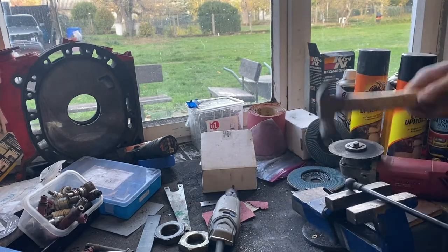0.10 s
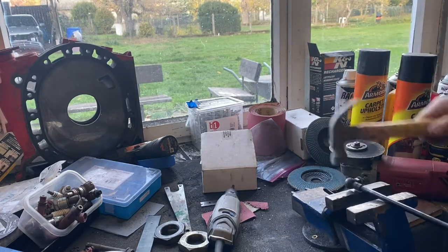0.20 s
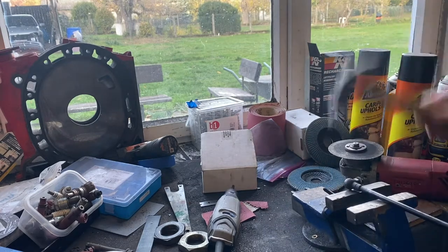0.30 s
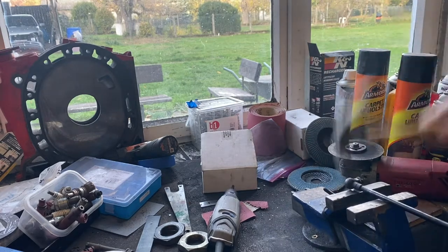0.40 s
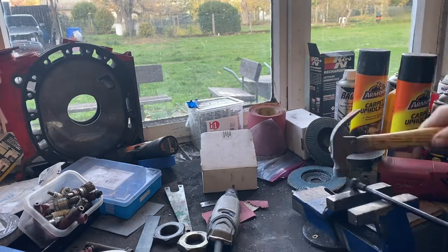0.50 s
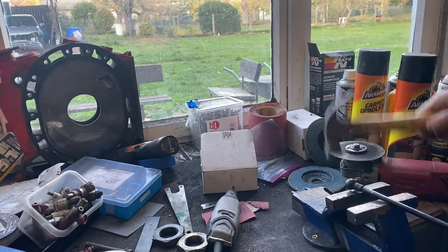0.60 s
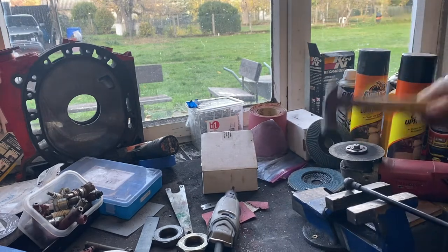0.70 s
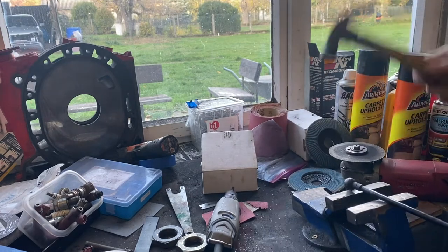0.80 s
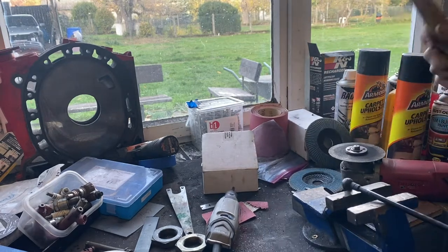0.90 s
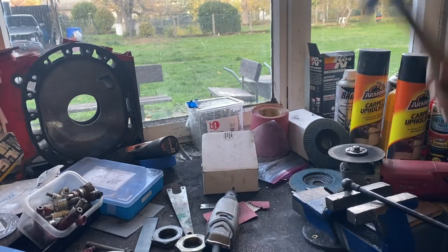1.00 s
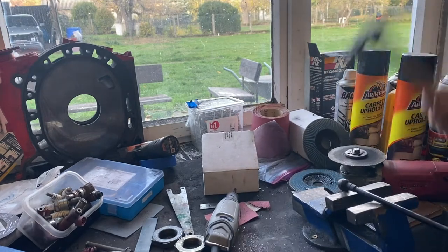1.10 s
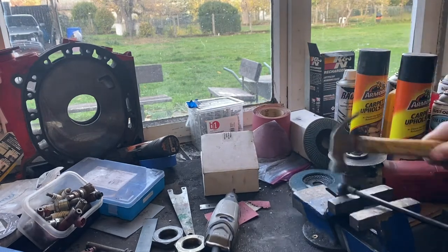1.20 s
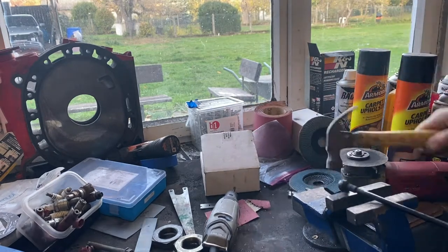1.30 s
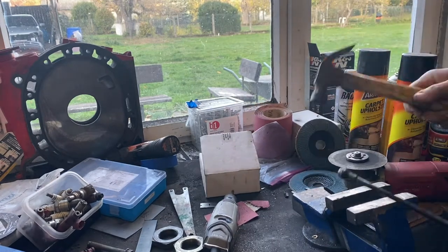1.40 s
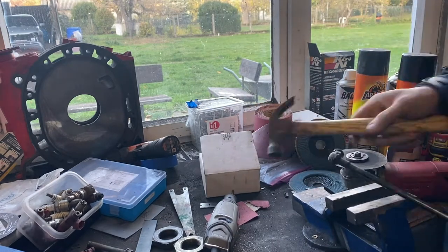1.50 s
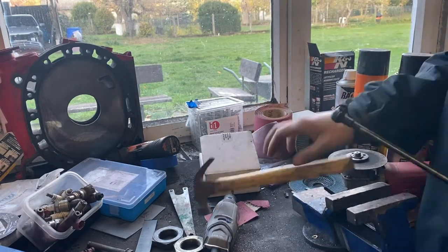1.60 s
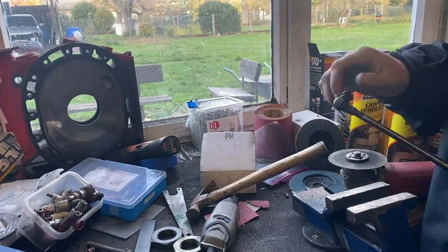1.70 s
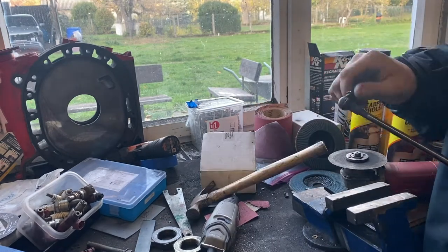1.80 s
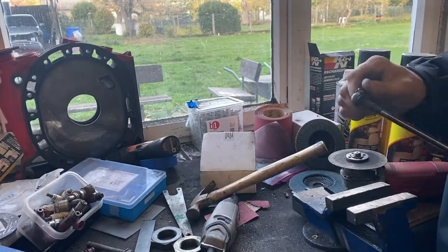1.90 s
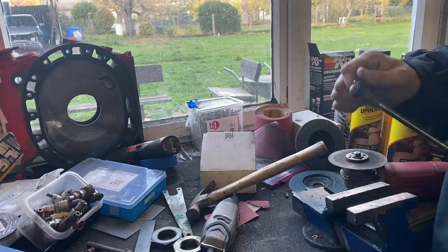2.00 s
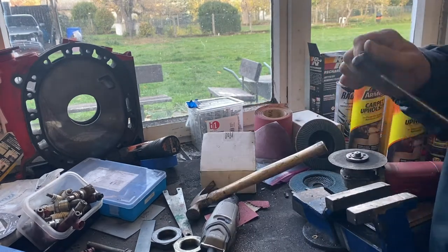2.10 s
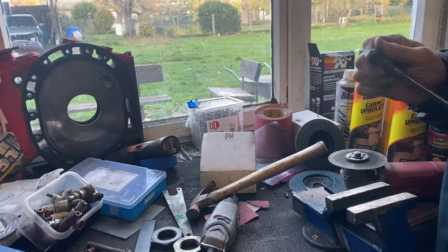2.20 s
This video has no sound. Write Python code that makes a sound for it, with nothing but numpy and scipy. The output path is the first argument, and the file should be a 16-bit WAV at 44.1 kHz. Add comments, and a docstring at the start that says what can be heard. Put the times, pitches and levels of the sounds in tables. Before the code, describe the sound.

Rapid hammering on clamped steel, bright cracks and short clanks, about eleven a second, stops abruptly; a softer wooden knocking follows as the hammer settles, then a faint sleeve brush in a quiet workshop, heard close in stereo.

```python
"""Over quiet room air, a steel hammer beats a steel part in a bench vise, about eleven blows a second.
Each blow cracks in noise bursts, rings the vise and steel as decaying partials, shakes the bench
and draws a brief noisy answer from the room. Then the hammer is laid on the bench with a short
wooden rattle of noise bursts and bench partials; last, a swell of noise is one soft sleeve brush."""
import sys
import numpy as np
from scipy.fft import rfft, irfft, next_fast_len
from scipy.io import wavfile

SR = 44100
rng = np.random.default_rng(int(sys.argv[2]) if len(sys.argv) > 2 else 0)


def store_pcm(level_fs):
    """Save levels as 16-bit WAV."""
    pcm = np.round(np.clip(level_fs, -1, 1) * 32767).astype(np.int16)
    wavfile.write(sys.argv[1], SR, np.atleast_2d(pcm).T)


N = 97020
T = np.arange(SR // 2) / SR  # time axis of one struck sound, s

# Hammer blows, layer levels before their trims: start_s, rise_s, knock_db, clank_db, crack_db,
# body_db, thud_db, rumble_db, room_db
HAMMER_BLOWS = [(0.24, 0.0051, -24.5, -31.5, -29, -23, -32.5, -44, -31.5),
                (0.357, 0.0074, -24, -37, -29, -29, -29, -40.5, -29),
                (0.4511, 0.0031, -18, -23, -24, -26, -30.5, -36.5, -28.5),
                (0.5448, 0.00033, -19, -19, -22, -40.5, -30.5, -41, -29),
                (0.6334, 0.00077, -19, -27, -24.5, -33, -31.5, -41.5, -30.5),
                (0.7197, 0.00064, -20, -15.5, -20.5, -36.5, -31.5, -41.5, -26),
                (0.811, 0.0043, -19, -26, -27, -30.5, -27.5, -40, -28),
                (0.8934, 0.00091, -19, -18.5, -21, -24.5, -33, -38.5, -28),
                (0.9819, 0.0012, -20.5, -16, -21, -24.5, -28.5, -31.5, -25.5),
                (1.068, 0.002, -19, -20, -21.5, -28, -29, -40, -28),
                (1.1609, 0.0024, -20.5, -26.5, -27.5, -22.5, -27.5, -33, -28.5),
                (1.252, 0.00048, -35.5, -19, -13.5, -32.5, -23.5, -36, -29),
                (1.338, 0.00038, -18, -14, -17.5, -34.5, -28.5, -38.5, -27.5)]
# Hammer settling on the bench: start_s, thump_db, clack_db, click_db
HAMMER_SETTLING = [(1.624, -33, -43.5, -58), (1.664, -28.5, -35.5, -39.5), (1.713, -32.5, -38.5, -55),
                   (1.726, -29, -45, -61), (1.794, -54, -68, -51.5)]

# Ringing steel partials: pitch_hz, relative_level_db, t60_s
STEEL_MODES = [(3760, -12, .2), (4532, -11, .3), (7470, -3, .35), (7540, -8, .3), (8263, -13, .2),
               (10945, 0, .35), (11010, -4, .35), (12273, -10, .25), (14400, -18, .25), (15045, -5, .3),
               (15148, -3, .3)]
# Clamped part and vise, heavily damped: pitch_hz, relative_level_db, t60_s
VISE_MODES = [(996, -8.5, 0.068), (1184, -8.5, 0.057), (1666, -1.5, 0.046), (2503, -4.5, 0.026),
              (3720, -4, 0.036)]
# Bench top partials: pitch_hz, relative_level_db, t60_s
BENCH_MODES = [(115.4, -1, 0.13), (130.4, -9.5, 0.75), (179.2, -3.5, 0.41), (271, -10, 0.37)]

# Steel contact, low part of its spectrum: pitch_hz, relative_level_db
KNOCK_COLOUR = [(150, -25.5), (330, 4), (600, -8.5), (1100, -0.5), (2000, -2.5), (2700, -9.5),
                (4000, -37.5)]
# Steel contact, middle part: pitch_hz, relative_level_db
CLANK_COLOUR = [(1600, -38), (2500, -2), (3200, -5), (3750, 0), (4300, -7), (5800, -4.5), (7500, -27)]
# Steel contact, bright part: pitch_hz, relative_level_db
CRACK_COLOUR = [(4000, -42.5), (6100, -3), (7000, 0.5), (8000, 6), (10000, 0.5), (11200, 2), (13000, -4),
                (15300, -6), (16500, -25)]
# Bench body: pitch_hz, relative_level_db
BODY_COLOUR = [(130, -23.5), (230, -3), (330, 2.5), (420, -9.5), (600, -30)]
# Bench thud: pitch_hz, relative_level_db
THUD_COLOUR = [(60, -24.5), (105, -0.5), (180, -0.5), (310, -3.5), (420, -13.5), (600, -22), (1200, -54)]
# Low shake under each blow: pitch_hz, relative_level_db
RUMBLE_COLOUR = [(15, -10), (30, -8), (60, 2.5), (90, -1), (140, -21), (300, -50.5)]
# Answer of the room: pitch_hz, relative_level_db
ROOM_COLOUR = [(200, -21.5), (450, 1.5), (1100, -1), (1900, -5.5), (2500, -3.5), (3200, -9.5), (4800, -8.5),
               (7000, -13), (11000, -21), (13000, -30), (15000, -30), (16000, -48.5)]
# Low thump of the laid-down hammer: pitch_hz, relative_level_db
THUMP_COLOUR = [(25, -13), (60, -1.5), (115, 3), (170, -1.5), (300, -10.5), (600, -18), (1200, -54)]
# Its wooden clack: pitch_hz, relative_level_db
CLACK_COLOUR = [(120, -10), (280, 0.5), (700, 4), (1500, -7), (3000, -11), (7000, -23), (15000, -34)]
# Its small bright click: pitch_hz, relative_level_db
CLICK_COLOUR = [(500, -4), (2500, 0), (7000, -2.5), (12000, -4.5), (16000, -17)]
# Steady room air: pitch_hz, relative_level_db
AIR_COLOUR = [(20, -2.5), (60, 0), (150, 1.5), (300, -9.5), (600, -9.5), (1200, -15), (3000, -19.5),
              (7500, -20), (16000, -27)]
SLEEVE_COLOUR = [(200, -11), (1000, -5), (6000, -5), (15000, -9)]  # pitch_hz, relative_level_db

# Left-right likeness of direct sound, clipped to -1..1 when used: pitch_hz, likeness
DIRECT_LIKENESS = [(100, 3.7), (450, 0.7), (1100, 0.85), (3000, -0.04), (3900, 1.85), (5300, -0.3),
                   (7000, 1.2), (15000, 0.7)]
# Left-right likeness of diffuse sound, same use: pitch_hz, likeness
ROOM_LIKENESS = [(60, 0.93), (200, .94), (450, 0.5), (1000, 0.21), (4500, 0.098), (6500, 0.17),
                 (8500, 0.96), (15000, 1)]
# Stereo lean of the contact: pitch_hz, left_minus_right_db
CONTACT_PAN = [(400, 0.5), (1000, .8), (2200, 1.5), (4000, 9), (7500, 1), (12000, 0.5)]

# Contact envelopes after each blow's own rise: hold_s, t60_s
KNOCK_ENV, CLANK_ENV, CRACK_ENV = (0.0016, 0.032), (0.0017, 0.017), (0.00054, 0.039)
# Other envelopes: attack_s, hold_s, t60_s
BODY_ENV, THUD_ENV = (0.003, 0.0089, 0.091), (0.014, 0.022, 0.34)
RUMBLE_ENV, ROOM_ENV, HANG_ENV = (0.015, 0.015, 0.22), (0.005, 0.014, 0.24), (0.01, 0.01, 0.4)
THUMP_ENV, CLACK_ENV, CLICK_ENV = (0.01, 0.011, 0.094), (0.0022, 0.003, 0.13), (0.001, 0.0013, 0.02)

# Layer trims, dB, added to the levels of each blow or settling knock
KNOCK_DB, CLANK_DB, CRACK_DB = 2, 1, 2.5
VISE_DB, STEEL_DB = -2.5, -14.5  # on top of knock_db and crack_db
BODY_DB, THUD_DB, BENCH_DB, RUMBLE_DB = 0.5, -0.5, 0, 2
ROOM_DB, HANG_DB = 2, -22
SETTLE_RING_DB = -10

# Tail drops: how early and how fast, then how deep for the steel and for bench and walls
CUT_LEAD_S, CUT_S = 0.012, 0.006
STEEL_CUT_DB, CUT_DEPTH_DB = -45, -12
LAST_LIFE_S = 0.14  # stands in for the gap after the last blow

AIR_DB = -71
BRUSH_S, BRUSH_WIDTH_S, BRUSH_DB = 2.07, 0.015, -64.5
PORT_LAG_S, LAG_ABOVE_HZ = 0.000238, 6850
TOP_HZ, TOP_ORDER = 16350, 90
CEILING = 0.9  # full scale is 1


def amp(db):
    """Decibels to gain."""
    return 10 ** (np.asarray(db) / 20)


def unit(x):
    """Scale to rms 1."""
    return x / np.sqrt(np.mean(x ** 2) + 1e-20)


def along(points, hz):
    """Read a curve of (Hz, value) points on a log frequency axis."""
    f, v = np.transpose(points)
    return np.interp(np.log(hz + 1), np.log(f + 1), v)


def add(out, start_s, sound):
    """Mix a sound in at its start time, trimmed at the end of the scene."""
    part = out[:, round(start_s * SR):][:, :sound.shape[-1]]
    part += sound[..., :part.shape[1]]


def noise(colour, alike, pan=None, size=len(T)):
    """Coloured stereo noise of rms 1; the mid-side balance sets how alike left and right are."""
    hz = np.fft.rfftfreq(size, 1 / SR)
    turn = np.arccos(np.clip(along(alike, hz), -1, 1)) / 2
    spectra = rfft(rng.standard_normal((2, size))) * amp(along(colour, hz))
    mid, side = spectra * [np.cos(turn), np.sin(turn)]
    lean = amp(np.outer([0.5, -0.5], along(pan, hz))) if pan else 1
    return unit(irfft(np.array([mid + side, mid - side]) * lean, size))


def burst(colour, shape, alike, pan=None):
    """Countless dense modes struck at once: attack, hold, decay, with a set energy."""
    attack, hold, t60 = shape
    decay_db = -60 * np.maximum(T - attack - hold, 0) / t60
    env = np.minimum(T / attack, 1) * amp(decay_db)
    return unit(env * noise(colour, alike, pan)) * np.sqrt(np.mean(env ** 2))


def ring(modes, attack, blur_hz, scatter_db):
    """Decaying partials whose phases wander, struck a little differently each time."""
    hz, db, t60 = np.transpose(modes)[:, :, None]
    steps = rng.standard_normal((len(hz), len(T)))
    drift = np.cumsum(steps, 1) * np.sqrt(2 * np.pi * blur_hz / SR)
    phase = 2 * np.pi * (hz * T + rng.random(hz.shape)) + drift
    level_db = db + scatter_db * rng.standard_normal(hz.shape) - 60 * T / t60
    return (amp(level_db) * np.sin(phase)).sum(0) * (1 - np.exp(-T / attack))


def room_air():
    """Steady, quiet coloured noise: the air of the workshop."""
    return amp(AIR_DB) * noise(AIR_COLOUR, ROOM_LIKENESS, size=N)


def sleeve_brush():
    """Cloth friction as noise under one short bell-shaped swell."""
    swell = np.exp(-0.5 * ((np.arange(N) / SR - BRUSH_S) / BRUSH_WIDTH_S) ** 2)
    return amp(BRUSH_DB) * swell * noise(SLEEVE_COLOUR, ROOM_LIKENESS, size=N)


def laying_down():
    """Head and wooden handle meet the bench one after the other and rock to rest."""
    out = np.zeros((2, N))
    for start_s, thump_db, clack_db, click_db in HAMMER_SETTLING:
        bench = ring(BENCH_MODES, attack=0.0056, blur_hz=1.7, scatter_db=1)
        thump = burst(THUMP_COLOUR, THUMP_ENV, ROOM_LIKENESS) + amp(SETTLE_RING_DB) * bench
        clack = burst(CLACK_COLOUR, CLACK_ENV, ROOM_LIKENESS)
        click = burst(CLICK_COLOUR, CLICK_ENV, DIRECT_LIKENESS)
        add(out, start_s, amp(thump_db) * thump + amp(clack_db) * clack + amp(click_db) * click)
    return out


def room_answer(room_db):
    """Dense reflections as diffuse noise: the brief answer, and a fainter, slower hang."""
    walls = amp(room_db + ROOM_DB) * burst(ROOM_COLOUR, ROOM_ENV, ROOM_LIKENESS)
    hang = amp(room_db + HANG_DB) * burst(ROOM_COLOUR, HANG_ENV, ROOM_LIKENESS)
    return walls, hang


def low_shake(rumble_db):
    """Deep rumble of the shaken bench, as a low noise burst."""
    return amp(rumble_db + RUMBLE_DB) * burst(RUMBLE_COLOUR, RUMBLE_ENV, ROOM_LIKENESS)


def shaken_bench(body_db, thud_db):
    """The cluttered bench: dense body and thud bursts, plus a few partials of its top."""
    body = amp(body_db + BODY_DB) * burst(BODY_COLOUR, BODY_ENV, ROOM_LIKENESS)
    thud = amp(thud_db + THUD_DB) * burst(THUD_COLOUR, THUD_ENV, ROOM_LIKENESS)
    top = amp(thud_db + BENCH_DB) * ring(BENCH_MODES, attack=0.017, blur_hz=6.6, scatter_db=1)
    return body + thud + top


def damped_vise(knock_db, rise_s):
    """Clamped part and vise: short, heavily damped partials, 3 dB louder on the left."""
    partials = ring(VISE_MODES, attack=rise_s, blur_hz=24.7, scatter_db=3.5)
    return amp(knock_db + VISE_DB) * partials * amp([[1.5], [-1.5]])


def ringing_steel(crack_db):
    """High partials of the struck steel, blurred by wandering phase."""
    return amp(crack_db + STEEL_DB) * ring(STEEL_MODES, attack=0.004, blur_hz=38, scatter_db=2)


def steel_contact(rise_s, knock_db, clank_db, crack_db):
    """Steel meets steel: low knock, middle clank and bright crack share one rise."""
    layers = [(KNOCK_COLOUR, KNOCK_ENV, knock_db + KNOCK_DB),
              (CLANK_COLOUR, CLANK_ENV, clank_db + CLANK_DB),
              (CRACK_COLOUR, CRACK_ENV, crack_db + CRACK_DB)]
    return sum(amp(level_db) * burst(colour, (rise_s, *env), DIRECT_LIKENESS, CONTACT_PAN)
               for colour, env, level_db in layers)


def hammering():
    """Each blow excites every layer; steel, bench and wall tails drop just before the next."""
    out = np.zeros((2, N))
    lives = np.append(np.diff([row[0] for row in HAMMER_BLOWS]), LAST_LIFE_S)
    for blow, life in zip(HAMMER_BLOWS, lives):
        start_s, rise_s, knock_db, clank_db, crack_db, body_db, thud_db, rumble_db, room_db = blow
        walls, hang = room_answer(room_db)
        shake = low_shake(rumble_db)
        bench = shaken_bench(body_db, thud_db)
        vise = damped_vise(knock_db, rise_s)
        steel = ringing_steel(crack_db)
        contact = steel_contact(rise_s, knock_db, clank_db, crack_db)
        # slides from 0 to 1 as the tails drop
        ending = 0.5 + 0.5 * np.tanh((T - life + CUT_LEAD_S) / (2 * CUT_S))
        tails = amp(STEEL_CUT_DB * ending) * steel + amp(CUT_DEPTH_DB * ending) * (walls + bench)
        add(out, start_s, contact + vise + shake + hang + tails)
    return out


def scene():
    """Hammering, then the hammer put down, over the quiet of the workshop."""
    return room_air() + sleeve_brush() + laying_down() + hammering()


def record(dry):
    """Round the highest peaks, lag the left port behind the right in the treble, limit the band."""
    size = next_fast_len(N + SR // 2)
    hz = np.fft.rfftfreq(size, 1 / SR)
    lag = 2 * np.pi * PORT_LAG_S * np.maximum(hz - LAG_ABOVE_HZ, 0)  # radians
    ports = np.exp(1j * np.outer([-0.5, 0.5], lag))
    band = 1 / (1 + (hz / TOP_HZ) ** TOP_ORDER)
    limited = dry / (1 + (dry / CEILING) ** 6) ** (1 / 6)
    return irfft(rfft(limited, size) * ports * band, size)[:, :N]


dry = scene()
out = record(dry)
store_pcm(out)
```